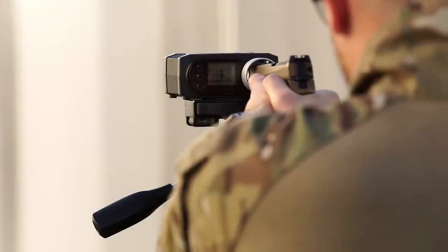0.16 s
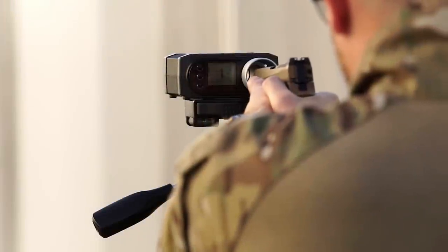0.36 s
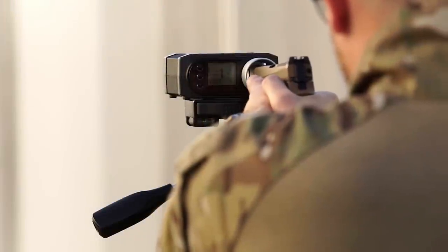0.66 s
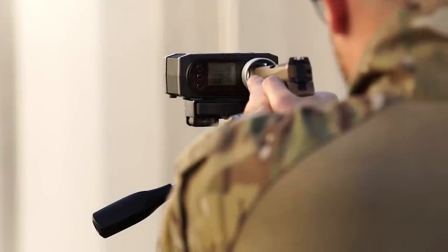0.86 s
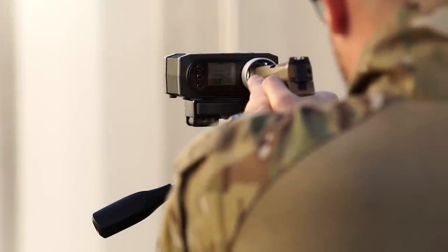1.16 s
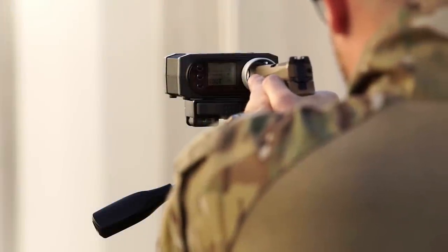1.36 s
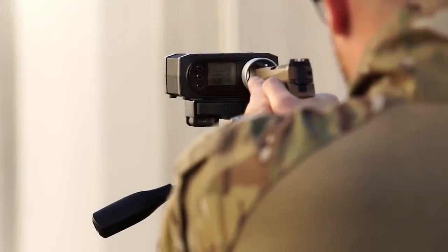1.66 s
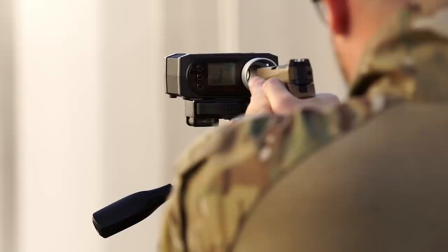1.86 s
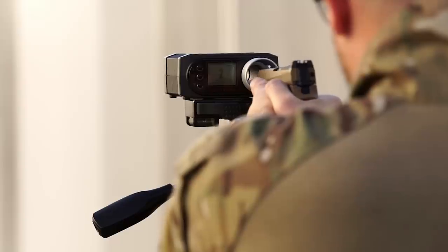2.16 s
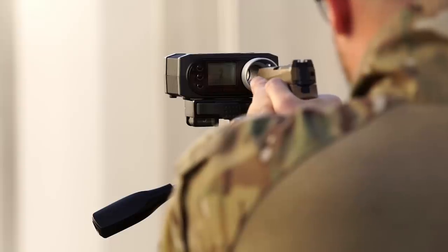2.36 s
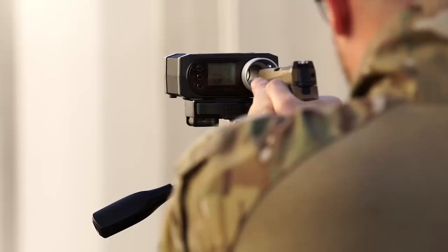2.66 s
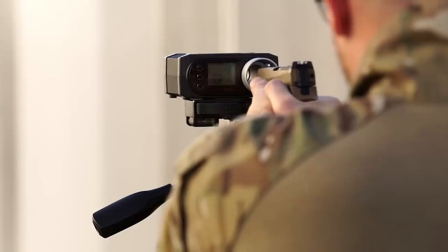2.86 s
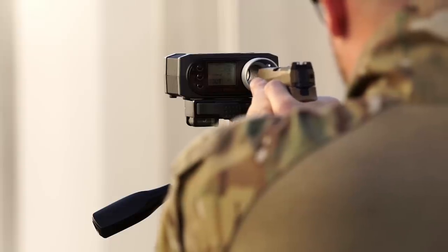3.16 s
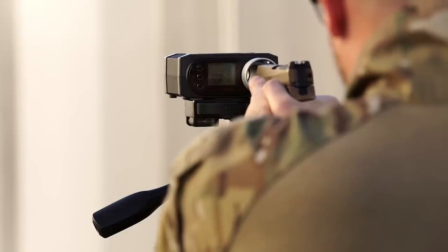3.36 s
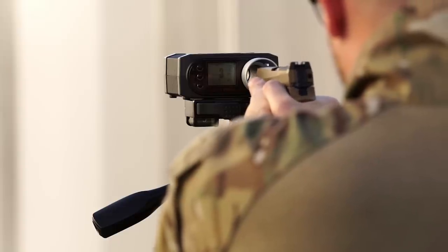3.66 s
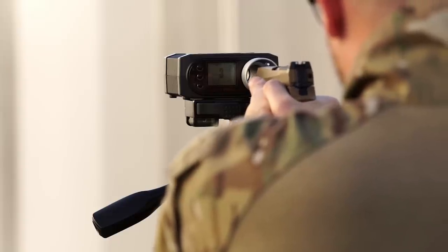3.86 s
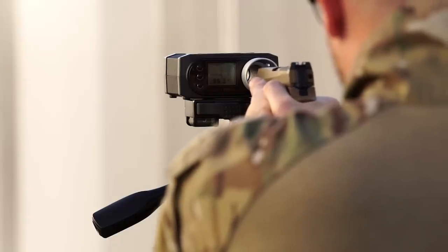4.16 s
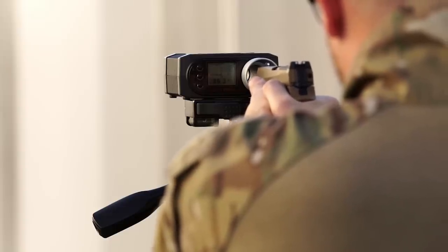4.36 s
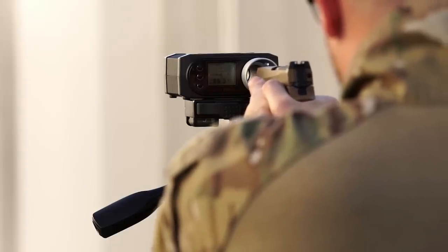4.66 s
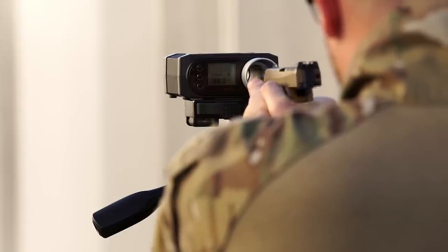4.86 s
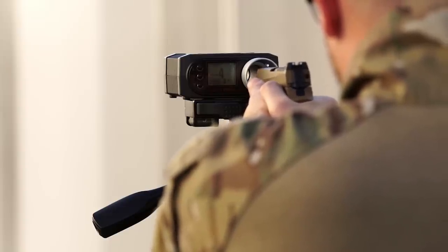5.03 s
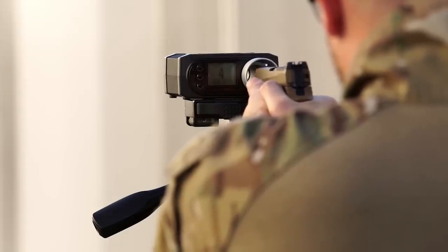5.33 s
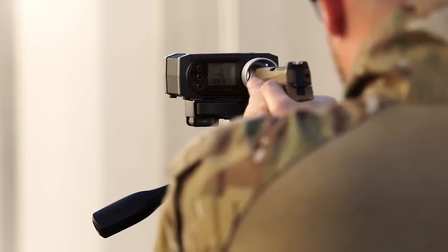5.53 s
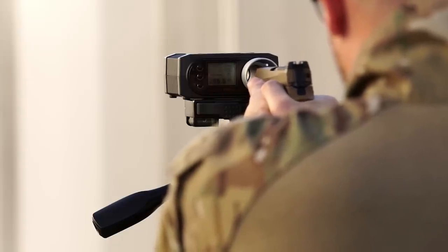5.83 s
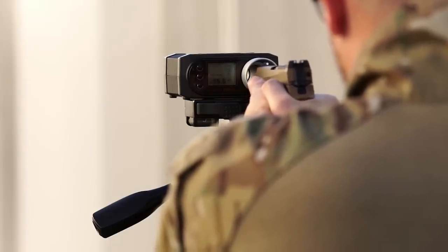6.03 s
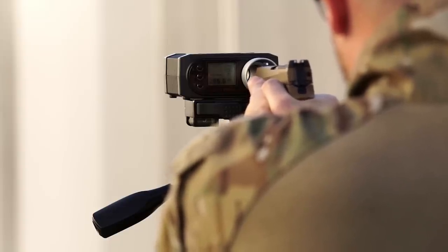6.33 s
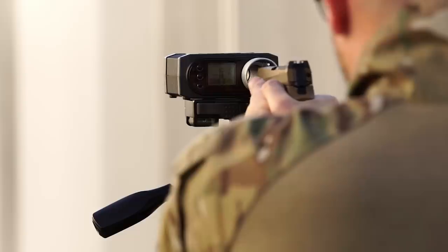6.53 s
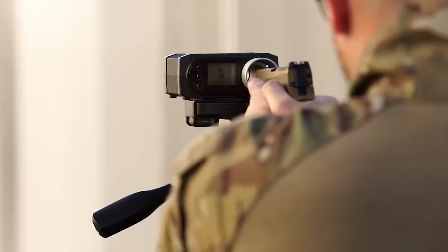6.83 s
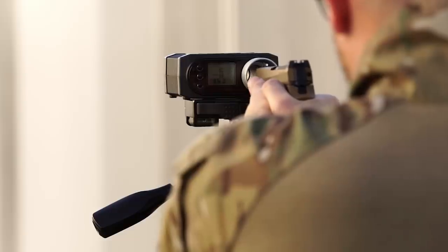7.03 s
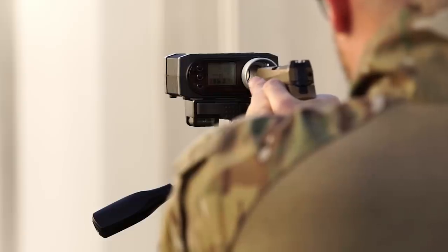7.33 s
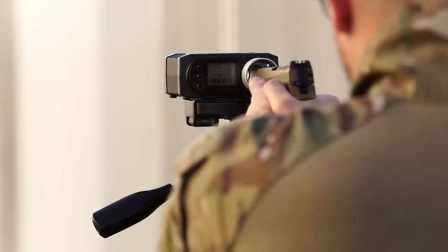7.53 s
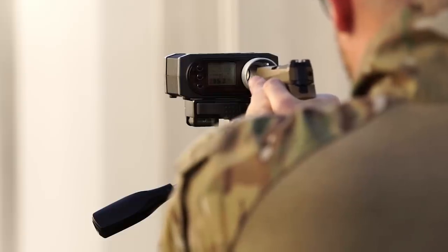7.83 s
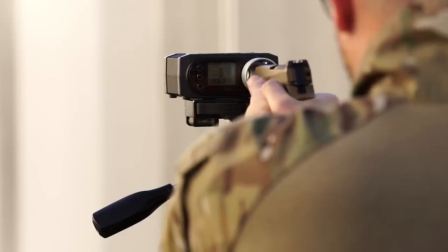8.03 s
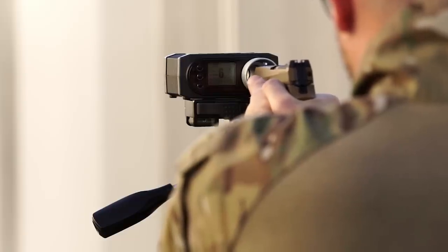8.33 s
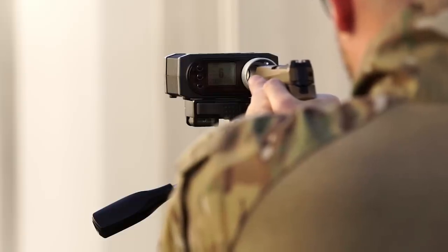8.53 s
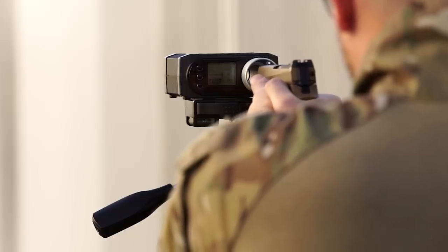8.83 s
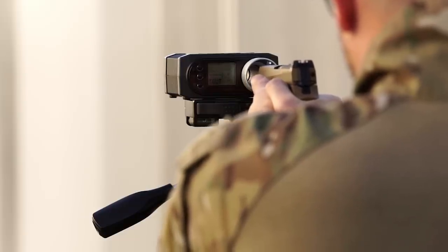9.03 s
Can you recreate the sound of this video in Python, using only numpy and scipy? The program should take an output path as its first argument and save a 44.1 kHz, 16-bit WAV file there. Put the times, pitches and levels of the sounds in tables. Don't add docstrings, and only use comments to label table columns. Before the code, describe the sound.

Six loud, dry airsoft pistol pops at a steady pace, recorded very near. Gas bursts out, the slide slams back and locks forward within a tenth of a second, and a thin yard echo dies away. After the third, fourth and fifth shots a pellet knocks a hollow target. Faint trigger clicks, one cloth brush and a small knock sit in the gaps, with soft far engine drone and traffic.

```python
import sys
import numpy as np
from scipy import signal
from scipy.io import wavfile
from scipy.ndimage import uniform_filter1d

SR = 44100
rng = np.random.default_rng(int(sys.argv[2]) if len(sys.argv) > 2 else 0)


def voltage_ratio(level):
    return 10 ** (np.asarray(level, float) / 20)


def master_out(mix):
    frames = np.transpose(np.atleast_2d(mix))
    ceiling = np.clip(frames, -1, 1)
    pcm = np.round(ceiling * 32767).astype(np.int16)
    wavfile.write(sys.argv[1], SR, pcm)


N = 405279

# hz, level_db
WASH_COLOUR = [(12, -33.5), (20, -12), (43, -7), (75, -2.5), (184, -4.5), (258, -3.5), (342, -9),
               (506, -9.5), (566, -9), (994, -15.5), (2120, -34.5), (11500, -46.5), (12800, -57),
               (14300, -50), (16500, -63.5)]
# start_s, level_db
TRAFFIC_LEVEL = [(0, -65.5), (.5, -62), (2.4, -62.5), (3.3, -62), (6.3, -60.5), (7, -64), (7.9, -66),
                 (9.19, -64.5)]
# pitch_hz, width_hz, level_db
IDLE_DRONE = (75, 20, -74)
# start_s, firing_hz, load_db
CLIMBING_GEARS = [
    [(0, 214, -64.5), (.4, 235.9, -67), (.9, 255, -64.5), (1.4, 268.6, -65), (2.1, 285.3, -65),
     (2.5, 296.5, -71.5), (2.7, 294, -83)],
    [(2.45, 247, -74), (2.8, 256, -68.5), (3.3, 270.3, -66), (3.9, 266.7, -74), (4.9, 252.5, -97.5)],
]
CRUISING_GEARS = [
    [(5.4, 160.2, -70.5), (5.75, 212.2, -72), (6, 222, -66.5), (6.35, 215, -70.5), (6.7, 209.5, -72.5)],
    [(6.7, 211, -94.5), (7.05, 210.1, -73), (7.6, 209.1, -78.5), (7.95, 212.8, -77.5), (8.5, 225, -73.5),
     (8.9, 238.9, -71.5), (9.19, 236.2, -70.5)],
]
# pitch_hz, level_db
CLIMBING_PIPE = [(218, -13), (238, -13.5), (262, -1.5), (290, -1.5), (436, -2), (525, -1.5), (550, -11),
                 (800, -20.5)]
# pitch_hz, level_db
CRUISING_PIPES = [
    [(160, -2.5), (222, 1), (320, -21), (650, -24.5)],
    [(210, 0), (236, -1.5), (330, -14.5), (420, 2.5), (450, -6.5), (650, -17.5)],
]

# start_s, hiss_db, tube_thump_db, gust_on_microphone_db
POPS = [
    (0.0949, -2, -4, -26),
    (1.8345, 1, -1, -33),
    (3.4022, 3, -3, -13.5),
    (4.9457, 0.5, -2, -45.5),
    (6.473, 1.5, -1.5, -13),
    (8.0074, -0.5, -3, -50),
]
# hz, level_db
POP_COLOUR = [(530, -31), (900, -3.5), (2590, -12.5), (4020, -14.5), (6160, -6), (6870, -14.5),
              (11300, -20), (12500, -18), (15000, -17), (16500, -35.5)]
# start_s, level_db
JOLTS = [
    (0.099, -25.5),
    (1.838, -21.5),
]

# stop_after_ms, stop_db, feed_db, lock_after_ms, lock_db
STROKES = [
    (25.4, -15, -27, 66.0, -15),
    (24.6, -16, -27, 67.5, -15),
    (24.7, -17, -22, 64.1, -14),
    (23.7, -14, -22.5, 67.0, -15),
    (24.2, -15, -24.5, 67.8, -14),
    (22.6, -12.5, -33, 66.0, -15.5),
]
# start_s, level_db, fall_ms
EXTRA_STOPS = [
    (.1344, -30, 1.1),
    (4.9625, -25, 1.8),
    (8.036, -29.5, 1.9),
]
# start_s, level_db, fall_ms
FRAME_KNOCKS = [
    (.116, -9.5, 1.4),
    (3.4238, -7, 1.4),
]
# hz, level_db
VENT_COLOUR = [(250, -39.5), (420, -18.5), (1370, -9), (1920, -10), (2300, -16), (3240, -19), (4080, -3.5),
               (4700, -9), (6980, -8), (10600, -22), (15500, -19), (16500, -38)]
# hz, level_db
STOP_COLOUR = [(180, -47), (300, -18), (1660, -12.5), (2480, -3), (3470, -9.5), (4310, 4), (5550, -14.5),
               (7500, -17.5), (14200, -15), (16500, -26)]
# hz, level_db
FRAME_COLOUR = [(180, -46), (300, -21), (2170, 2), (4460, -13), (7380, -17.5), (8730, -24), (10100, -27.5),
                (15400, -33), (16500, -35.5)]
# hz, level_db
FEED_COLOUR = [(180, -42), (300, -11.5), (848, -6.5), (1660, -4.5), (2520, -11), (3900, -4.5), (4390, -5.5),
               (14400, -21.5), (16500, -36)]
# hz, level_db
LOCK_COLOUR = [(180, -58), (300, -18), (1450, 0.5), (2480, -4.5), (4030, -1), (5370, -11.5), (7260, -9.5),
               (8730, -14.5), (15700, -18.5), (16500, -38)]
# pitch_hz, width_hz, level_db
SLIDE_MODES = [(1487, 87, -14), (1900, 150, -13), (4077, 390, -5), (4830, 140, -14), (7430, 260, -13),
               (9500, 210, -14), (14400, 220, -21.5)]

# hz, level_db
YARD_TONE = [(200, -7), (1000, 6), (2000, 1), (3000, -3.5), (4200, -5.5), (6200, -3), (7000, -4),
             (11000, -3.5), (15500, -5)]
# hz, t60_s
YARD_DECAY = [(200, 0.48), (1000, 0.45), (2500, 0.64), (4500, 0.59), (6300, 0.78), (6700, 0.5),
              (14000, 0.59)]
# pitch_hz, width_hz, level_db
TUBE_MODES = [(1050, 100, -22), (2070, 43, -17.5), (3170, 120, -25.5), (6170, 120, -24)]
# delay_s, level_db, dull_above_hz
WALLS = [
    (.134, -30.5, 2010),
    (.272, -40, 1160),
]

# start_s, level_db, fall_ms
TICKS = [(.3146, -41, 1), (.3678, -57, 0.93), (2.0554, -43, 1), (2.1074, -60, 0.94), (3.6422, -41.5, 0.94),
         (3.752, -67, 0.92), (5.2401, -54, 0.89), (5.293, -55, 0.79), (5.703, -70, 0.74),
         (6.7899, -53, 0.9), (7.146, -65.5, 0.74), (7.635, -72.5, 0.86), (8.2513, -43, .9),
         (8.2798, -59, .9)]
# start_s, level_db, fall_ms
RUSTLES = [
    (6.1005, -47, 4.5),
    (6.15, -69.5, 8.),
]
# start_s, level_db, fall_ms
KNOCKS = [
    (7.6423, -45, .5),
    (7.6478, -55, .8),
]
# hz, level_db
TICK_COLOUR = [(600, -22.5), (1300, -2), (2500, -5), (3900, -5), (5500, -6), (7000, -7), (9000, -16.5),
               (16500, -22.5)]
# hz, level_db
RUSTLE_COLOUR = [(650, -41), (1100, -15), (2270, -10.5), (2820, -11), (4280, -9), (9260, -2), (15400, -8),
                 (16500, -42.5)]
# hz, level_db
KNOCK_COLOUR = [(250, -16.5), (600, 4.5), (1800, 9), (2800, -8.5), (4200, -19.5), (6000, -48.5),
                (12000, -53)]

# start_s, level_db, fall_ms
HITS = [
    (3.5234, -21.5, 9.6),
    (5.0647, -23, 7.8),
    (6.5921, -23, 6.8),
]
# after_ms, level_under_hit_db, fall_ms
RATTLE = [
    (34.8, -11.5, 2.3),
    (39, -15.5, 8),
    (91, -20, 2.7),
]
# start_s, level_db, fall_ms
STRAYS = [
    (3.573, -39, 3.6),
    (3.77, -64, 9.),
    (3.99, -74, 5.),
    (6.62, -40, 3.3),
    (6.82, -60, 4.),
]
# hz, level_db
HIT_COLOUR = [(180, -67), (300, -46), (754, 1), (1630, -25), (2030, -12.5), (2480, -18), (3190, -8.5),
              (4850, -9), (13300, -25), (16500, -31)]
# hz, level_db
BOUNCE_COLOUR = [(470, -45), (800, -2.5), (2380, -10), (3180, 4.5), (4000, -2), (5620, -0.5), (14400, -20),
                 (15900, -27), (16500, -31)]
# pitch_hz, width_hz, level_db
TARGET_MODES = [(740, 33, -14.5), (932, 29, -40.5), (2100, 56, -22), (3280, 210, -19.5)]
# hz, level_db
RANGE_TONE = [(200, 7), (1000, -2), (3500, 4.5), (6000, 0.5), (10000, 4), (13000, 0), (15500, 11.5)]
# hz, t60_s
RANGE_DECAY = [(200, 0.4), (1000, 0.63), (3000, 0.81), (5000, 0.79), (9000, 0.83), (15000, 0.4)]


def evened(x):
    return x / np.sqrt(np.mean(x ** 2) + 1e-20)


def read(points, hz):
    f, value = np.transpose(points)
    return np.interp(np.log(hz + 1), np.log(f + 1), value)


def add(mix, s, sound):
    stretch = mix[round(s * SR):][:len(sound)]
    stretch += sound[:len(stretch)]


def after(ms):
    return np.array(POPS)[:, 0] + np.asarray(ms) / 1000


def same_rows(times, db, fall_ms):
    return np.transpose(np.broadcast_arrays(times, db, fall_ms))


def colour(points, size=1024):
    level_db = np.maximum(read(points, abs(np.fft.fftfreq(size, 1 / SR))), -100)
    log_gain = np.log(voltage_ratio(level_db))
    taps = np.fft.ifft(np.exp(np.conj(signal.hilbert(log_gain)))).real[:size // 2]
    return taps / np.linalg.norm(taps)


def rings(modes, size=4096):
    t, out = np.arange(size) / SR, np.zeros(size)
    for hz, width, db in modes:
        ring = np.exp(-np.pi * width * t) * np.sin(2 * np.pi * hz * t)
        out += voltage_ratio(db) * ring / np.linalg.norm(ring)
    return out


def strikes(rows, rise_ms, grit_db, likeness=.85):
    out, ms = np.zeros(N), np.arange(-441, 2646) * 1000 / SR
    habit, *fresh = rng.standard_normal((16, 2, len(ms)))
    for (s, db, fall_ms), chance in zip(rows, fresh):
        noise, grit = likeness * habit + np.sqrt(1 - likeness ** 2) * chance
        shape = np.exp(np.where(ms < 0, ms / rise_ms, -ms / fall_ms))
        rough = voltage_ratio(grit_db * evened(uniform_filter1d(grit, size=30)))
        add(out, s + ms[0] / 1000, voltage_ratio(db) * shape * evened(noise * rough))
    return out


def struck(rows, tone, rise_ms, grit_db, modes=(), plain_db=0.):
    body = rings(modes)
    add(body, 0, voltage_ratio(plain_db) * colour(tone))
    return signal.oaconvolve(strikes(rows, rise_ms, grit_db), body)[:N]


def wash():
    hop, answer_db, answer_s, patchy_db = 256, 3.5, 0.12, 1.6
    frames, hz = N // hop + 5, np.fft.rfftfreq(1024, 1 / SR)
    real, imaginary, patches = rng.standard_normal((frames, 513, 3)).T
    patches = uniform_filter1d(uniform_filter1d(patches, size=4, axis=0), size=14, axis=1)
    outdoor = (1 / (1 + (hz / 2500) ** 2))[:, None]
    t = np.arange(frames) * hop / SR
    since = np.maximum(t - after(0)[:, None], 0) / answer_s
    answer = (since * np.exp(1 - since)).sum(0)
    level_db = np.interp(t, *np.transpose(TRAFFIC_LEVEL)) + answer_db * answer
    drift_db = outdoor * (patchy_db * evened(patches) + level_db - level_db.mean())
    z = (real + 1j * imaginary) * voltage_ratio(read(WASH_COLOUR, hz)[:, None] + drift_db)
    noise = signal.istft(z, nperseg=1024, noverlap=768)[1][:N]
    return voltage_ratio(level_db.mean() - 0.8) * evened(noise)


def idle():
    hz, width, db = IDLE_DRONE
    band = signal.butter(2, [hz - width / 2, hz + width / 2], "band", fs=SR, output="sos")
    return voltage_ratio(db) * evened(signal.sosfilt(band, rng.standard_normal(N)))


def engine(rows, pipe):
    s, hz, load_db = np.transpose(rows)
    t = np.arange(s[0], s[-1], 1 / SR)
    drift = [evened(uniform_filter1d(v, size=3000)) for v in rng.standard_normal((4, len(t)))]
    hz, load_db = np.interp(t, s, hz), np.interp(t, s, load_db) + 4.0
    turns = np.cumsum(hz * (1 + 0.01 * drift[3])) / SR
    half_db = load_db - 13 + read(pipe, hz * 3 / 2) + 1.6 * drift[2]
    out = voltage_ratio(half_db) * np.sin(3 * np.pi * turns)
    buzz_db = 21.5 * np.exp(-((t - 1.1) / 0.037) ** 2)
    for order in (1, 2, 3):
        order_db = load_db + read(pipe, order * hz) + 2.3 * drift[order - 1]
        if order == 3:
            order_db = order_db + buzz_db
        out += voltage_ratio(order_db) * np.sin(2 * np.pi * order * turns)
    return s[0], out


def muzzle():
    bursts = [(s - .0006, db, 1.) for s, db, _, _ in POPS]
    hiss = struck(bursts, POP_COLOUR, .6, 2.4, [(4580, 340, -10.0)], -1.3)
    lead_in = [(s - .003, -32, 1.) for s, *_ in POPS]
    hiss += struck(lead_in, POP_COLOUR, 2., 0.88)
    push, gust, ms = np.zeros(N), np.zeros(N), np.arange(-441, 2646) * 1000 / SR
    from_peak = ms - .9
    swell = np.exp(np.where(from_peak < 0, from_peak / 1.15, -from_peak / 1.2))
    swing = swell * np.cos(2 * np.pi * .56 * from_peak)
    swing -= 0.22 * np.roll(swing, round(9.3 * SR / 1000))
    u = (ms - 2.4) / 3.2
    puff = u * np.exp(np.where(u < 0, 2.5 * u, -u)) * np.cos(np.clip(u, 0, 9) * 0.3) * np.e
    for s, _, thump_db, gust_db in POPS:
        add(push, s + (ms[0] - .15) / 1000, voltage_ratio(thump_db) * swing)
        add(gust, s + ms[0] / 1000, voltage_ratio(gust_db) * puff)
    return hiss + push, gust


def stand():
    hz, width_hz = 100, 45
    out, t = np.zeros(N), np.arange(4000) / SR
    shudder = np.exp(-np.pi * width_hz * t) * np.sin(2 * np.pi * hz * t)
    for s, db in JOLTS:
        add(out, s, voltage_ratio(db) * shudder)
    return out


def action():
    stop_ms, stop_db, feed_db, lock_ms, lock_db = np.transpose(STROKES)
    opens = same_rows(after(8.1 - .22 * np.arange(len(POPS))), -0.97, 1.7)
    vent = struck(opens, VENT_COLOUR, 1.0, 2., [(4120, 630, -4.5), (520, 160, -17)], -4.5)

    stops = [*same_rows(after(stop_ms), stop_db, 1.9), *EXTRA_STOPS]
    stop = struck(stops, STOP_COLOUR, .35, 3., [(2520, 400, -6.5)], -2.1)
    stop += struck(FRAME_KNOCKS, FRAME_COLOUR, 0.24, 3.7, [(1850, 330, -9.5)], -9.0)

    feeds = same_rows(after(lock_ms - 12), feed_db, 0.99)
    locks = same_rows(after(lock_ms), lock_db, 4.3)
    rebounds = same_rows(after(lock_ms + 7.1), lock_db - 12.5, 4.4)
    lock = struck(feeds, FEED_COLOUR, .35, 4.0)
    lock += struck(locks, LOCK_COLOUR, .35, 2., SLIDE_MODES, -2.)
    lock += struck(rebounds, LOCK_COLOUR, 2.5, 5.6, SLIDE_MODES, -0.8)

    scrapes = same_rows(after(15.0), -29.5, 22.)
    rushes = same_rows(after(lock_ms - 3.), -34., 2.)
    drag = struck(scrapes, FEED_COLOUR, 9., 3.) + struck(rushes, FEED_COLOUR, 4., 2.5)
    return vent + stop + lock + drag


def yard(x, tone, decay):
    taps, at = np.zeros((3, SR)), np.arange(300, SR - 20, 20)
    places = at + rng.integers(0, 20, (3, len(at)))
    np.put_along_axis(taps, places, rng.choice([-1., 1.], (3, len(at))), 1)
    hz, t, z = signal.stft(taps, SR, nperseg=256)
    z = z * voltage_ratio(read(tone, hz)[:, None] - 60 * t / read(decay, hz)[:, None])
    lumps = rng.standard_normal(z.shape[1:])
    lumps = uniform_filter1d(uniform_filter1d(lumps, size=9, axis=0), size=4, axis=1)
    ragged_db = 2.
    tails = signal.istft(z * voltage_ratio(ragged_db * evened(lumps)), SR, nperseg=256)[1]
    tails = tails / np.linalg.norm(tails[0])
    phase = np.arange(N) / 70 + np.arange(3)[:, None] / 3
    turn = np.cos(2 * np.pi * phase) * np.sqrt(2 / 3)
    return signal.fftconvolve(x * turn, tails, axes=1).sum(0)[:N]


def walls(x):
    out = np.zeros(N)
    for delay, db, top_hz in WALLS:
        band = signal.butter(2, [600, top_hz], "band", fs=SR)
        add(out, delay, voltage_ratio(db) * signal.lfilter(*band, x))
    return out


def handling():
    knocks = struck(KNOCKS, KNOCK_COLOUR, 0.26, 0.76, [(1800, 220, -9.0), (1000, 140, -1.5)], -3.4)
    ticks = struck(TICKS, TICK_COLOUR, 0.16, 1.1, [(4020, 260, -10.5), (1520, 480, 0)], 1.5)
    cloth = struck(RUSTLES, RUSTLE_COLOUR, 1.5, 4.0)
    return ticks + cloth + knocks


def downrange():
    bounces = []
    for s, db, _ in HITS:
        bounces += [(s + ms / 1000, db + under_db, fall_ms) for ms, under_db, fall_ms in RATTLE]
    hits = struck(HITS, HIT_COLOUR, .3, 2., TARGET_MODES, -2.)
    return hits + struck(bounces + list(STRAYS), BOUNCE_COLOUR, 1.5, 2.)


def scene():
    pop, gust = muzzle()
    near = signal.lfilter(*signal.butter(2, 105, "high", fs=SR), pop + action())
    blast = signal.lfilter(*signal.butter(2, 45, "high", fs=SR), gust)
    far = downrange()
    hands = handling()
    street = wash() + idle()
    pipes = [CLIMBING_PIPE, CLIMBING_PIPE, *CRUISING_PIPES]
    for gear, pipe in zip([*CLIMBING_GEARS, *CRUISING_GEARS], pipes):
        add(street, *engine(gear, pipe))
    echo = yard(voltage_ratio(-29.0) * near + voltage_ratio(-17.5) * hands, YARD_TONE, YARD_DECAY)
    echo += signal.oaconvolve(echo, rings(TUBE_MODES))[:N]
    echo += yard(voltage_ratio(-14) * far, RANGE_TONE, RANGE_DECAY)
    return (street + near + blast + far + hands + echo + walls(pop) + stand())[None]


def roll_off(x):
    return signal.sosfilt(signal.butter(12, 16970, fs=SR, output="sos"), x)


def record(dry):
    clip_at, shelf_hz, shelf_db, edge_hz = .7, 15900, -20, 16900
    held = dry / (1 + abs(dry / clip_at) ** 6) ** (1 / 6)
    lost = signal.lfilter(*signal.butter(2, 70, "high", fs=SR), dry - held)
    held = dry - lost
    low, full = (signal.firwin(511, hz, window=("kaiser", 9), fs=SR) for hz in (shelf_hz, edge_hz))
    shelf = low + voltage_ratio(shelf_db) * (full - low)
    return roll_off(signal.oaconvolve(held, shelf[None], "same"))


dry = scene()
out = record(dry)
master_out(out)
```